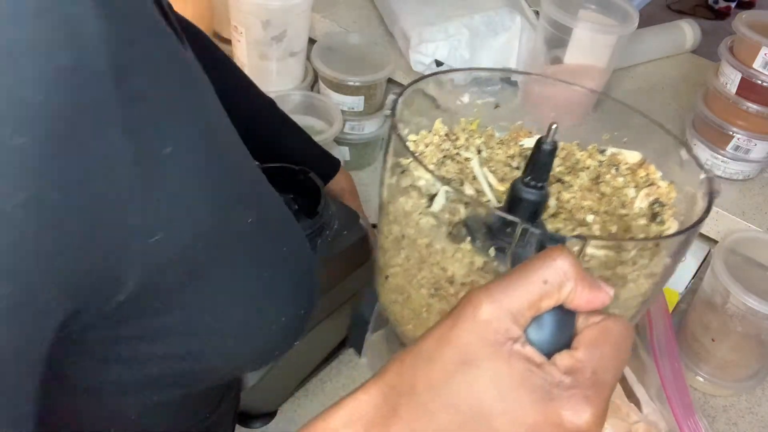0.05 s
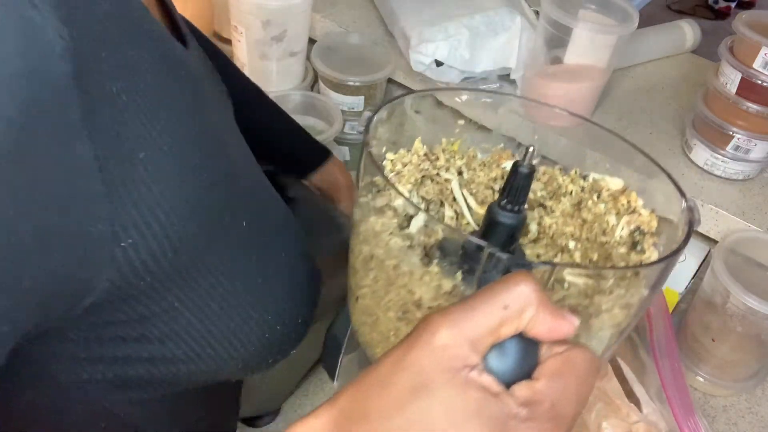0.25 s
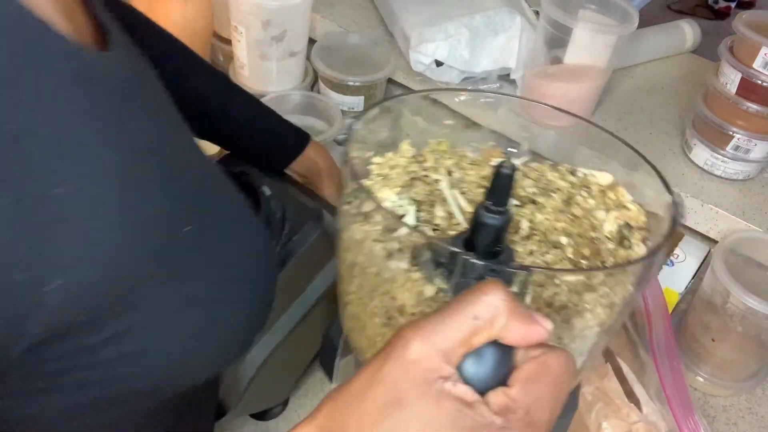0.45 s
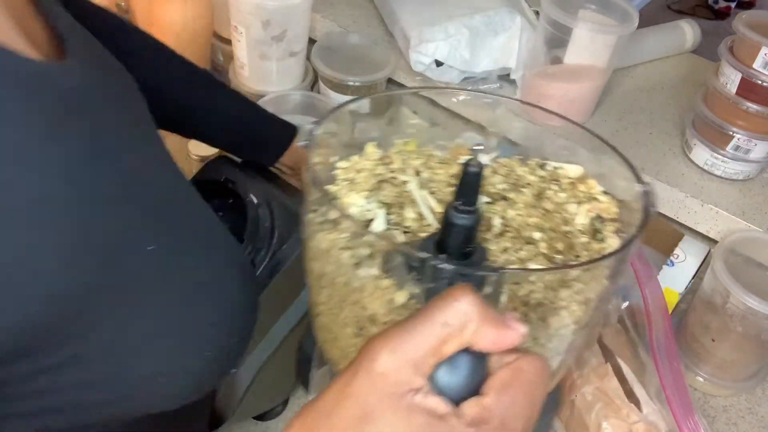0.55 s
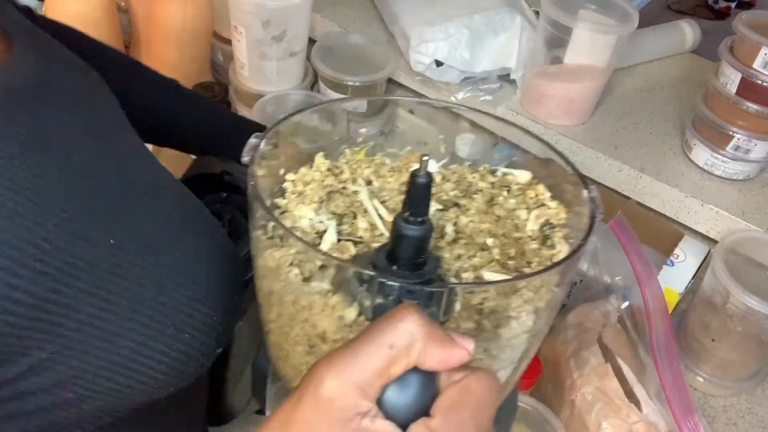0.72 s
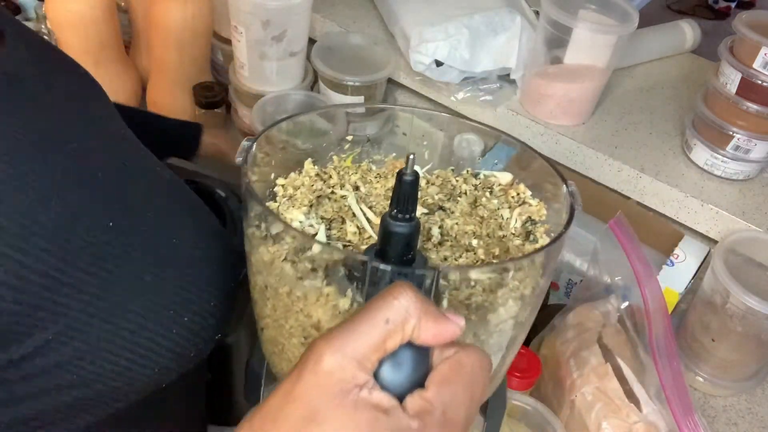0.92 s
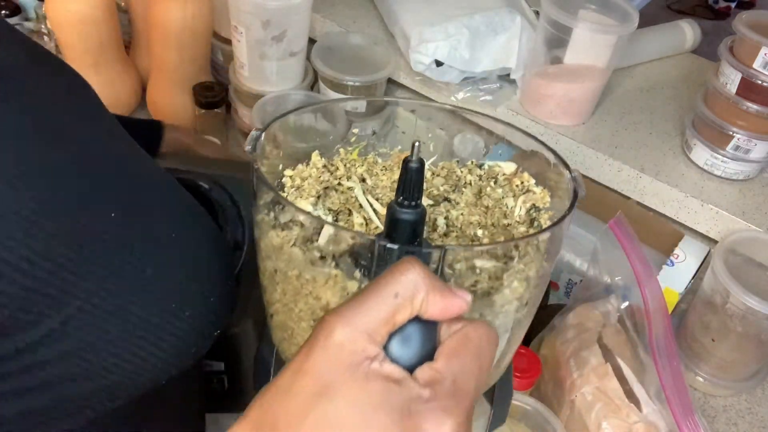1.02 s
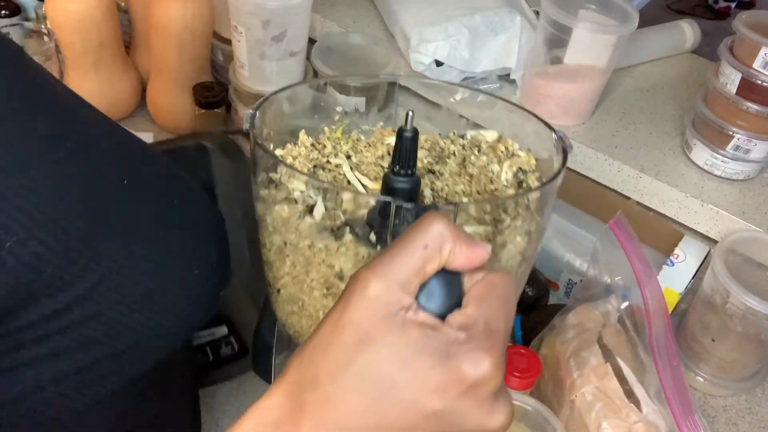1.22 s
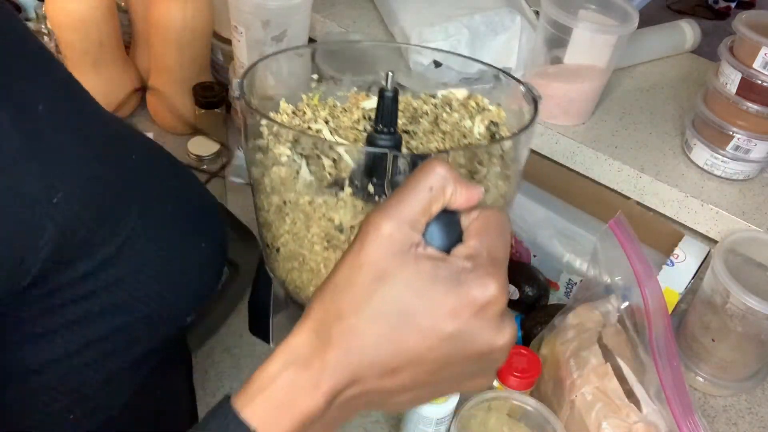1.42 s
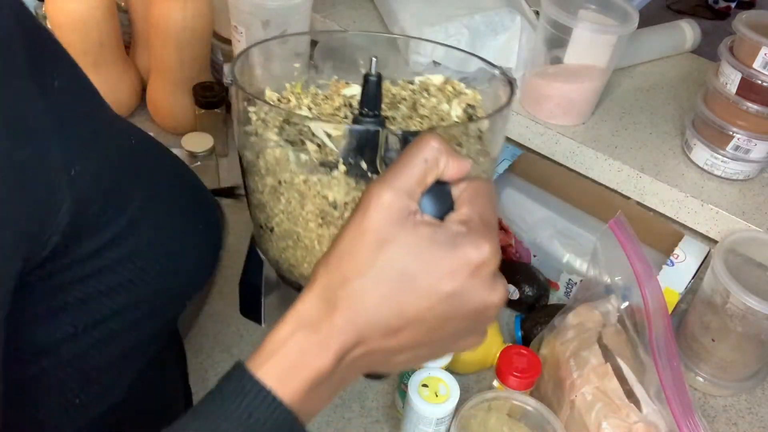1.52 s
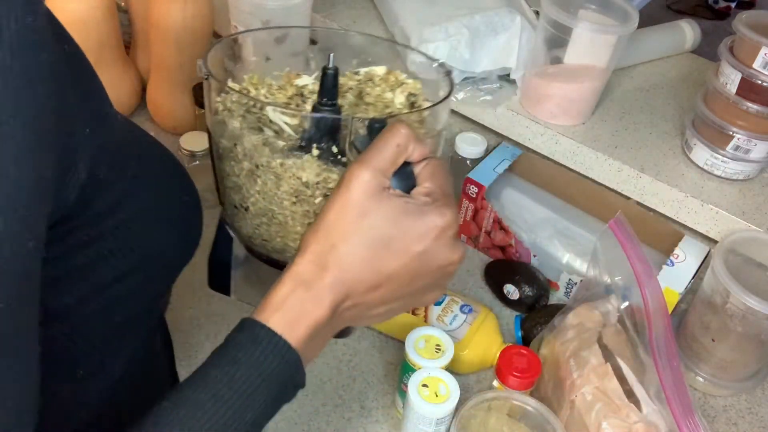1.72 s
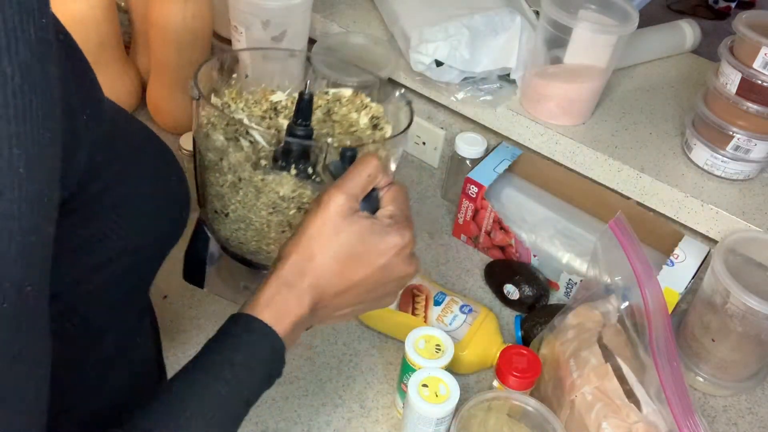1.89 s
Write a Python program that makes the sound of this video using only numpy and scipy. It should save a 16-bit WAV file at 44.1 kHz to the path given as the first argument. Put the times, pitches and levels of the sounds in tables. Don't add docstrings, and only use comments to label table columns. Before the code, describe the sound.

A hard plastic food processor bowl clunks and rattles onto a counter, then small handling knocks, bright latch clicks and a short rubber-foot stutter; close stereo microphone in a lively kitchen with faint fridge hum.

```python
import sys
import numpy as np
from scipy import signal
from scipy.fft import rfft, irfft
from scipy.io import wavfile
from scipy.ndimage import uniform_filter1d

SR = 44100
rng = np.random.default_rng(int(sys.argv[2]) if len(sys.argv) > 2 else 0)


def put_to_file(sound):
    columns = np.atleast_2d(sound).T
    safe = np.clip(columns, -1, 1)
    whole_steps = np.round(safe * 32767)
    wavfile.write(sys.argv[1], SR, whole_steps.astype(np.int16))


def rack_gain(trim_db):
    fader = np.asarray(trim_db, float)
    return 10 ** (fader / 20)


N = 85995


def gain_at(points, hz):
    f, db = np.transpose(points)
    return rack_gain(np.interp(np.log(hz + 1), np.log(f + 1), db))


def evened(x):
    return x / np.sqrt(np.mean(x ** 2) + 1e-20)


def colour(x, points):
    hz = np.fft.rfftfreq(2 * N, 1 / SR)
    return irfft(rfft(x, 2 * N) * gain_at(points, hz))[..., :N]


def train(start_s, level_db):
    x = np.zeros(N)
    np.add.at(x, (np.asarray(start_s) * SR).astype(int), rack_gain(level_db))
    return x


def ring(x, modes, contact_s=0.0009, order=1):
    t = np.arange(SR // 2) / SR
    tap = sum(rack_gain(db - 60 * t / t60) * np.sin(2 * np.pi * hz * t) for hz, db, t60 in modes)
    tap = tap * (1 - np.exp(-t / contact_s)) ** order
    return signal.fftconvolve(x, tap / abs(tap).max())[:N]


def strikes(start_s, level_db, modes, contact_s):
    spread = 0.05
    shift = 1 + spread * rng.uniform(-1.14, 1, (len(start_s), len(modes), 1)) * [1, 0, 0]
    hits = zip(start_s, level_db, shift)
    return sum(ring(train([s], [db]), modes * factor, contact_s) for s, db, factor in hits)


def crack(points, t60, peak_hz, peak_db, bright_db):
    t, hz = np.arange(2048) / SR, np.fft.rfftfreq(2048, 1 / SR)
    favoured = peak_db * np.exp(-(np.log2(hz / peak_hz + 1e-9) / 0.63) ** 2)
    treble = bright_db * np.clip(hz / 9000, 0, 1) ** 2
    x = irfft(rfft(rng.standard_normal(2048)) * gain_at(points, hz) * rack_gain(favoured + treble))
    x = x * rack_gain(-60 * t / t60) * (1 - np.exp(-t / 0.00015))
    return x / abs(x).max()


def cracks(start_s, level_db, points, t60, peaks_hz=1000, peak_db=0, brights_db=0):
    out = 0
    for s, db, peak_hz, bright_db in np.broadcast(start_s, level_db, peaks_hz, brights_db):
        burst = crack(points, t60, peak_hz, peak_db, bright_db)
        out = out + signal.fftconvolve(train([s], [db]), burst)[:N]
    return out


def far_hits(start_s, level_db, points, bright_db=0):
    sign = rng.choice([-1., 1.], N)
    dull = colour(train(start_s, level_db) * sign, points)
    bright = colour(train(start_s, level_db + bright_db) * sign, points)
    x = uniform_filter1d(dull - bright, size=5) + bright
    return x / abs(dull).max() * rack_gain(max(level_db))


# start_s, level_db, thud_db of the counter, bright_db
SET_DOWN_HITS = [(0.2133, -36, -50.5, -21), (0.2185, -19.5, -25, -20.5), (0.2223, -16, -36, -18.5),
                 (.2270, -22.5, -15, -8), (0.2350, -12, -23.5, 2), (0.2363, -7.5, -18, -0.5),
                 (.2420, -31.5, -11, 12), (0.2447, -17, -49, -10), (0.2528, -30, -20, -6.5),
                 (0.258, -25, -52, -5), (.263, -29, -52, 2), (.272, -23.5, -40, -3), (.286, -21, -33, -4),
                 (0.311, -35, -20.5, -4), (0.334, -31, -37.5, -2), (.385, -47.5, -33, 3)]
# freq_hz, level_db
EDGE_COLOUR = [(200, -34.5), (700, 2), (1400, 1.5), (2500, -1.5), (3900, 1), (4900, -16.5), (7500, -15.5),
               (12000, -14)]
# pitch_hz, level_db, t60_s
SHELL_MODES = [(690, 5, 0.034), (845, -3, 0.023), (925, -1.5, 0.021), (1214, -2, 0.024), (1420, 2, 0.023),
               (1600, 4, 0.03), (1880, 19.5, 0.011), (2913, 5, 0.036), (4096, -2, 0.01),
               (3934, -10.5, 0.016), (4350, -20.5, 0.016)]
# pitch_hz, level_db, t60_s
SNAP_MODES = [(1250, -5, 0.005), (1600, 0, .0028)]
# pitch_hz, level_db, t60_s
COUNTER_MODES = [(59.2, -2.5, 0.24), (86.6, -6, 0.068), (113.7, -0.5, 0.044), (190.6, -4, 0.086),
                 (236, -17.5, 0.16), (372.5, -11.5, 0.033), (431.3, -20, 0.32)]


def set_down():
    s, db, thud_db, bright_db = np.transpose(SET_DOWN_HITS)
    edge = cracks(s, db - 0.5, EDGE_COLOUR, 0.024, brights_db=bright_db)
    far_edge = far_hits(s, db, EDGE_COLOUR, bright_db)
    snap = ring(train([0.23352], [-7.5]), SNAP_MODES, 0.0014, order=2)
    shell = strikes(s, db - 4.0, SHELL_MODES, 0.0007) - snap
    first_rock = ring(train([0.2205], [-18]), COUNTER_MODES[3:4], 0.0056)
    thud = ring(train(s, thud_db), COUNTER_MODES, 0.00092) + first_rock
    return edge, far_edge, shell, -thud


# start_s, level_db
RIM_TICKS = [
    (0.2331, -24),
    (0.2348, -29),
]


def rim_ticks():
    s, db = np.transpose(RIM_TICKS)
    return cracks(s, db, CLICK_COLOUR, 0.0082)


# start_s, level_db, pitch_hz, thud_db, bright_db
KNOCKS = [(0.075, -39, 4600, -62, -12.5), (.6740, -38, 2740, -46, -15), (0.7064, -36, 5000, -52, -17),
          (0.721, -46, 800, -29.5, -17), (0.782, -52.5, 6280, -64, 11), (.745, -54, 4520, -62, -10),
          (.818, -40.5, 2800, -57, -14), (.848, -44.5, 2200, -63, -16), (0.8800, -37.5, 2870, -54, -28),
          (0.9321, -44, 2900, -36, 9.5), (1.141, -60, 1000, -37.5, -4), (1.288, -44.5, 2300, -56, -1),
          (1.434, -45, 596, -37, -12), (1.4601, -54, 500, -33.5, -9), (1.4686, -34, 500, -29.5, -16),
          (1.8896, -39, 1600, -68, 5.5), (1.93, -45, 1130, -63, 0)]
# freq_hz, level_db
KNOCK_COLOUR = [(150, -6), (500, 9), (1500, 6), (3000, -13), (5000, -8), (7400, -15), (12000, -20.5)]
# pitch_hz, level_db, t60_s
BOWL_MODES = [(195, -2.5, 0.067), (248.5, 5, 0.028), (440, 4.5, 0.029)]


def handling():
    s, db, peak_hz, thud_db, bright_db = np.transpose(KNOCKS)
    knock = cracks(s, db + 2.0, KNOCK_COLOUR, 0.035, peak_hz, 9.4, bright_db)
    return knock, ring(train(s, thud_db), BOWL_MODES, 0.0012)


# start_s, level_db
CLICKS = [(1.2851, -33), (1.2878, -32), (1.2896, -41), (1.2924, -41), (1.4298, -39.5), (1.4522, -28),
          (1.4532, -26), (1.4572, -32), (1.4638, -40), (1.471, -46)]
# freq_hz, level_db
CLICK_COLOUR = [(500, -10), (2000, -8), (3500, 0), (5000, 5.5), (7000, -1), (11000, -1), (14000, -2),
                (16500, 1.5)]
# pitch_hz, level_db, t60_s
LATCH_MODES = [(4040, 4.5, 0.036), (4670, 7.5, 0.016), (5930, 5.5, 0.014), (5730, 1, 0.0082),
               (7430, 4, .01), (11150, -4, 0.0053), (12300, 2, .008), (13460, -9, .008)]
# pitch_hz, level_db, t60_s
SPRING_MODES = [(5420, 3, .07), (6900, -4, .06), (7030, -15, .05), (8300, -3, .03), (11100, -8, 0.091),
                (15300, -14, 0.032)]


def latch():
    s, db = np.transpose(CLICKS)
    ticks = cracks(s, db - 3.0, CLICK_COLOUR, 0.012)
    stiff = strikes(s, db - 10.0, LATCH_MODES, 0.00025)
    ping = ring(train([1.4308], [-47.5]), SPRING_MODES, 0.0054)
    return ticks + stiff + ping, far_hits(s, db, CLICK_COLOUR)


# start_s, tick_db, weight_db
SLIPS = [(1.504, -37.5, -31), (1.518, -36.5, -28), (1.526, -37, -25), (1.5359, -27, -24),
         (1.5464, -21, -21.5), (1.5551, -24.5, -20), (1.5645, -18.5, -18), (1.576, -30.5, -31),
         (1.5831, -31.5, -25), (1.5874, -31, -31), (1.5928, -46, -26), (1.5985, -27, -31),
         (1.604, -42, -21.5), (1.6164, -38, -33), (1.623, -31.5, -37), (1.634, -34, -40), (1.649, -33, -33),
         (1.668, -48, -45), (1.69, -40, -37), (1.713, -44.5, -33)]
# freq_hz, level_db
FOOT_COLOUR = [(150, -15), (400, 10), (1200, 2), (1900, -9), (2600, -25), (3500, -46), (8000, -69)]
# pitch_hz, level_db, t60_s
BASE_MODES = [(240, -12, 0.034), (317, -1, 0.059), (453, 5.5, 0.026), (540, -2, 0.017), (647, -0.5, 0.033),
              (800, -18, 0.071), (834, 2, 0.013), (982, 2, 0.029), (1160, 5.5, 0.016), (1387, -0.5, 0.016),
              (1700, -1, 0.023), (1940, -13, 0.0064)]


def stutter():
    s, db, weight_db = np.transpose(SLIPS)
    settle_s = 0.0017
    upper = strikes(s, db - 4.5, BASE_MODES[5:], 0.00074)
    rubber = cracks(s, db - 7.0, FOOT_COLOUR, 0.027)
    weight = strikes(s + settle_s, weight_db - 5.5, BASE_MODES[:5], 0.00097)
    return upper + rubber - weight


# start_s, level_db
RUSTLE_LEVEL = [(0.0, -58), (0.173, -80.5), (0.233, -36), (0.384, -51.5), (0.532, -59), (0.77, -55.5),
                (1.096, -64), (1.34, -69.5), (1.472, -49), (1.51, -56.5), (1.716, -59), (1.95, -58.5)]
# freq_hz, level_db
RUB_COLOUR = [(300, 12), (800, 6.5), (2000, -5.5), (4000, -11.5), (7000, -20.5), (12000, -32)]


def rustle():
    s, db = np.transpose(RUSTLE_LEVEL)
    grain_db = 12 * uniform_filter1d(rng.exponential(1, N), 60)
    grains = rng.standard_normal((2, N)) * rack_gain(grain_db)
    level = rack_gain(np.interp(np.arange(N) / SR, s, db) + 5.0)
    return level * evened(colour(grains, RUB_COLOUR))


# start_s, length_s, level_db
SWISHES = [
    (0.394, 0.2, -56.5),
    (0.752, 0.13, -69.5),
]


def swishes():
    t = np.arange(N) / SR
    shape = 0
    for s, length_s, db in SWISHES:
        shape = shape + rack_gain(db) * np.sin(np.pi * np.clip((t - s) / length_s, 0, 1)) ** 2
    return shape * evened(colour(rng.standard_normal((2, N)), CLICK_COLOUR))


# freq_hz, level_db per hertz
AIR_COLOUR = [(30, -25.5), (130, -4), (200, -8), (650, -14), (900, -20.5), (1500, -26.5), (4000, -52),
              (12000, -60)]
# pitch_hz, width_hz, level_db
HUM_LINES = [(59.4, 39, -52), (120.9, 9, -50), (167.5, 3.5, -55.5), (335.5, 5.55, -56), (490.7, 57, -64.5),
             (535.4, 17, -60), (671, 10, -58), (1112, 56, -67)]


def kitchen_air():
    out = rack_gain(-45 - 5.5) * evened(colour(rng.standard_normal((2, N)), AIR_COLOUR))
    steady = 0.71
    for hz, width_hz, db in HUM_LINES:
        r = np.exp(-np.pi * width_hz / SR)
        z = rng.standard_normal((2, N + SR)) + 1j * rng.standard_normal((2, N + SR))
        z = signal.lfilter([1], [1, -2 * r, r * r], z)[:, SR:]
        waver = evened(z.real) + 1j * evened(z.imag)
        carrier = np.exp(2j * np.pi * hz * np.arange(N) / SR)
        out = out + rack_gain(db) * evened(((waver + steady) * carrier).real)
    return out


# freq_hz, t60_s
ROOM_DECAY = [(40, .12), (90, .22),
              (300, 0.23), (1000, 0.51), (3000, 0.58), (7000, 0.53), (14000, 0.32)]


def room():
    taps = np.zeros((2, SR))
    at = np.arange(120, SR - 20, 20) + rng.integers(0, 20, (2, (SR - 121) // 20))
    np.put_along_axis(taps, at, rng.choice([-1., 1.], at.shape), 1)
    hz, t, z = signal.stft(taps, SR, nperseg=1024)
    f, t60 = np.transpose(ROOM_DECAY)
    band_t60 = np.interp(np.log(hz + 1), np.log(f), t60)[:, None]
    tail = signal.istft(z * rack_gain(-60 * t / band_t60), SR, nperseg=1024)[1][:, :SR]
    tail = tail * (np.arange(SR) > 120)
    return tail / np.linalg.norm(tail[0])


# freq_hz, level_db
DIFFUSE_GAP = [(7600, 0), (7900, -45), (9500, -32), (9800, -3), (14800, 3), (15300, -38)]
# freq_hz, level_db
MID_COLOUR = [(28, -17), (48, 0), (6500, 2), (7700, -2.5), (7900, -9), (9450, -11.5), (9800, 2.5),
              (15200, -1), (16500, -25)]
# freq_hz, level_db
SIDE_COLOUR = [(20, -48), (60, -15), (150, -18.5), (350, 1), (5000, 3), (10800, 4), (11500, -27),
               (13700, -39.5), (14100, -2.5)]


def scene():
    edge, far_edge, shell, thud = set_down()
    knock, bump = handling()
    tick, far_tick = latch()
    slip = stutter()
    near = edge + shell + thud + knock + bump + tick + rim_ticks() + slip
    wet = rack_gain(-11.0) * edge + rack_gain(8.0) * far_edge + rack_gain(-9.5) * shell + rack_gain(-4.0) * thud
    wet = wet + rack_gain(-2.5) * knock + rack_gain(-6.0) * bump + rack_gain(8.0) * far_tick + rack_gain(-3.0) * slip
    around = signal.fftconvolve(wet[None], room(), axes=1)[:, :N]
    around = around + rustle() + swishes() + kitchen_air()
    late = signal.hilbert(near).imag
    mid = colour(colour(around[0], DIFFUSE_GAP) + near, MID_COLOUR)
    side = colour(around[1] + rack_gain(-3.0) * late, SIDE_COLOUR)
    return np.array([mid + side, mid - side])


def top_cut(x):
    return signal.sosfilt(signal.butter(12, 16470, fs=SR, output="sos"), x)


def record(dry):
    ceiling = 0.9
    held = dry / (1 + (dry / ceiling) ** 6) ** (1 / 6)
    return top_cut(held)


dry = scene()
out = record(dry)
put_to_file(out)
```